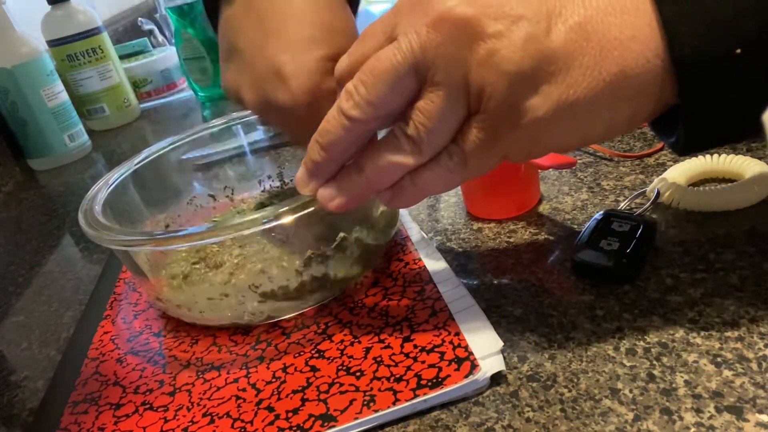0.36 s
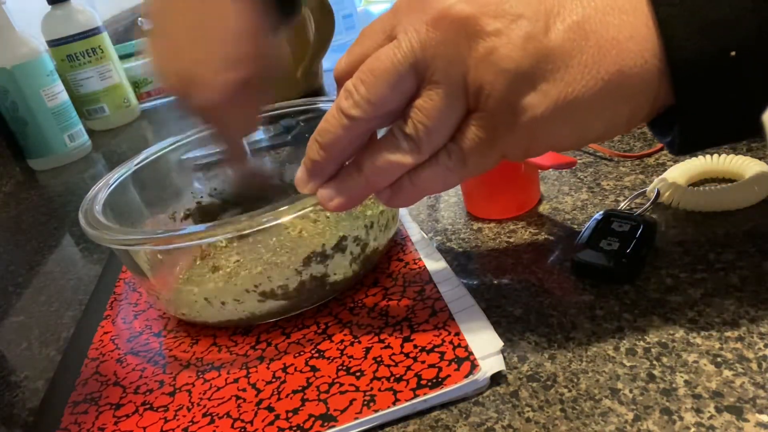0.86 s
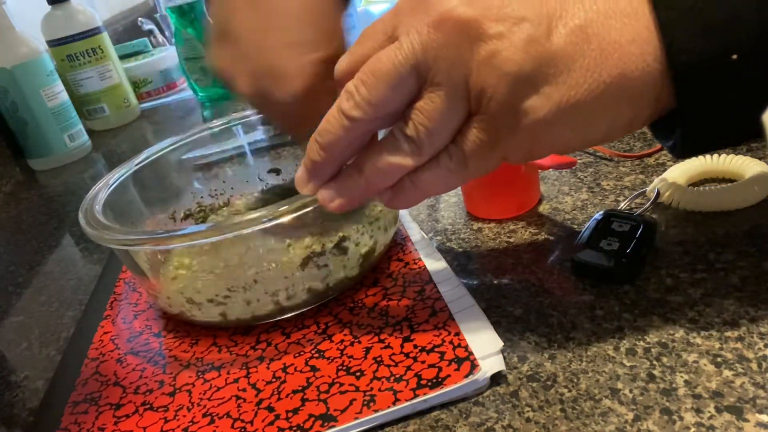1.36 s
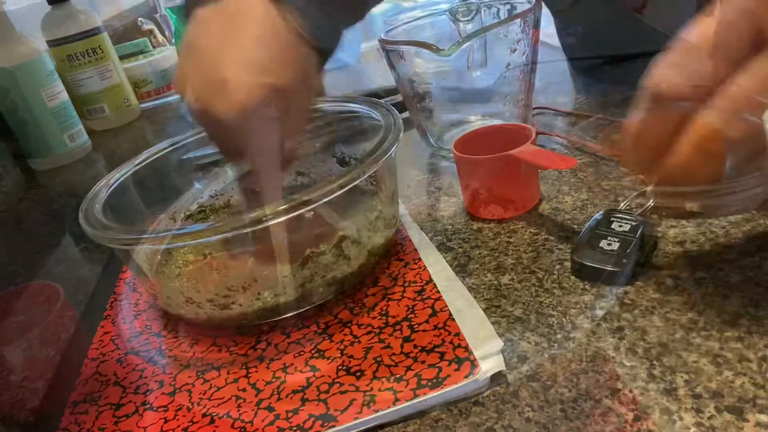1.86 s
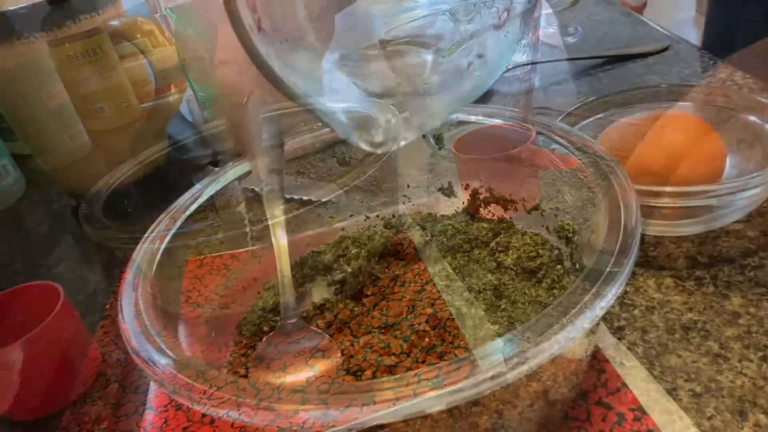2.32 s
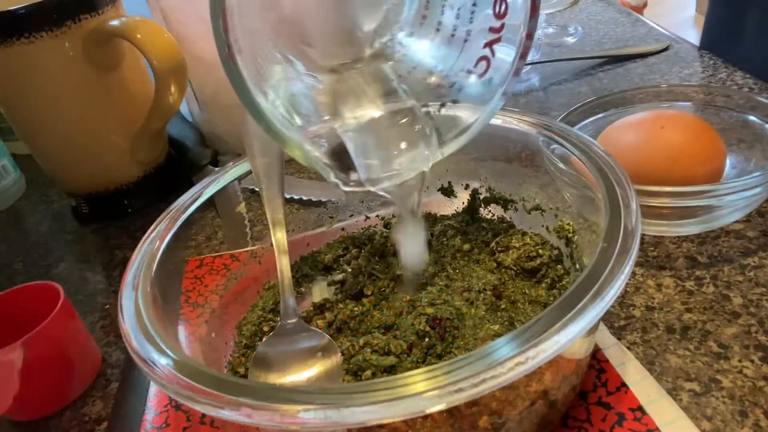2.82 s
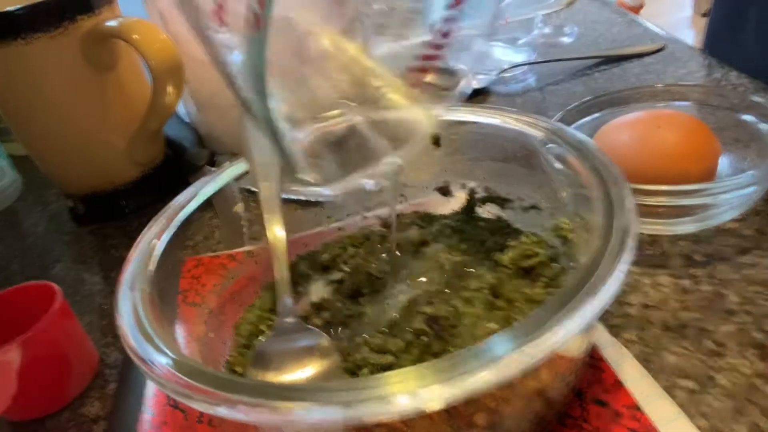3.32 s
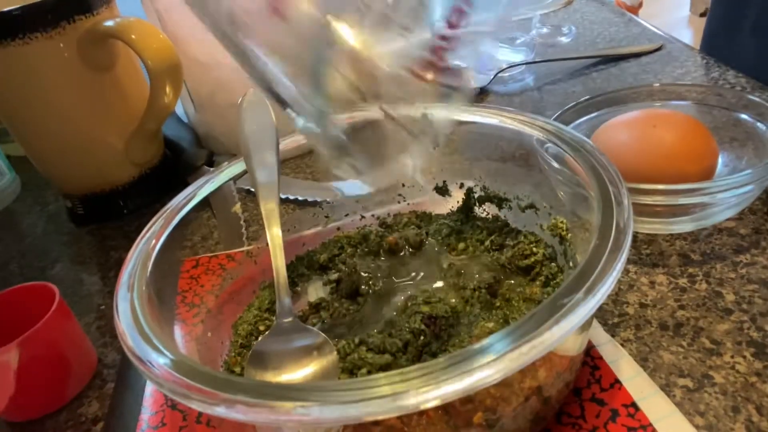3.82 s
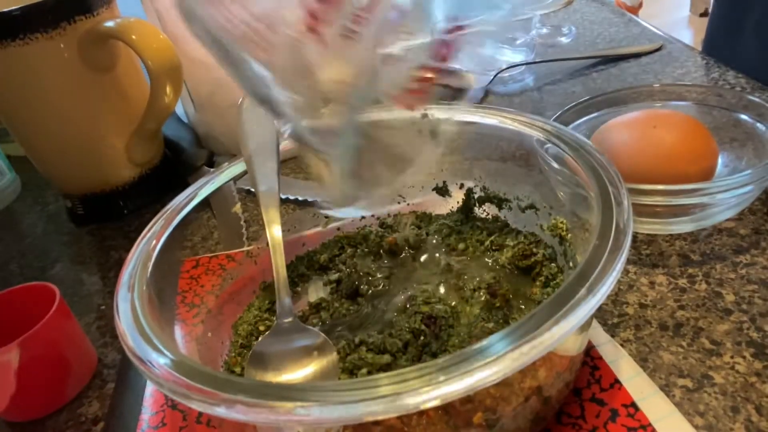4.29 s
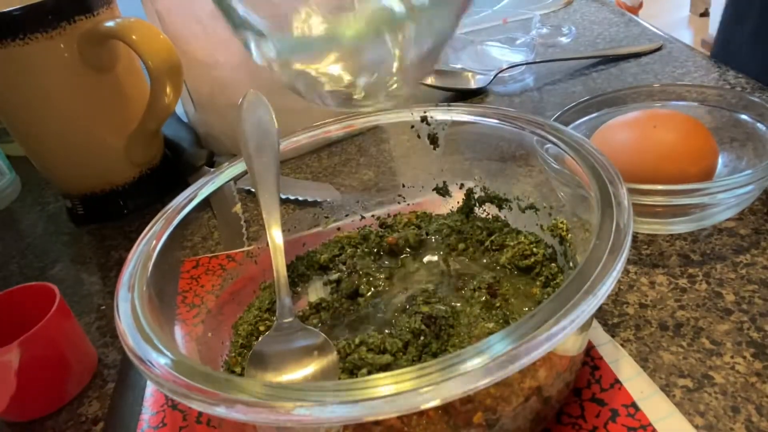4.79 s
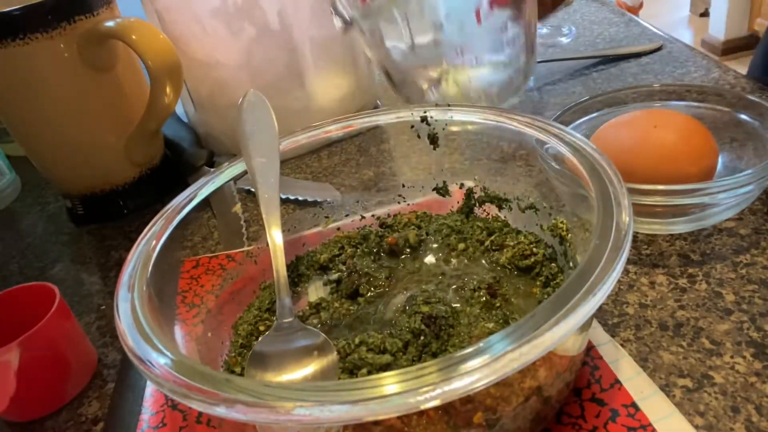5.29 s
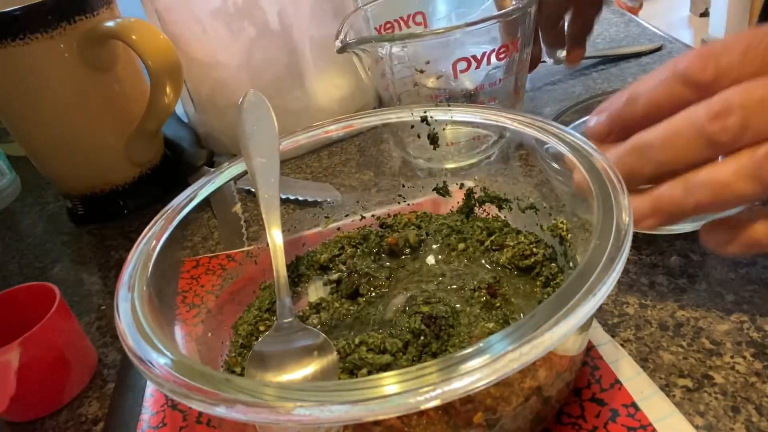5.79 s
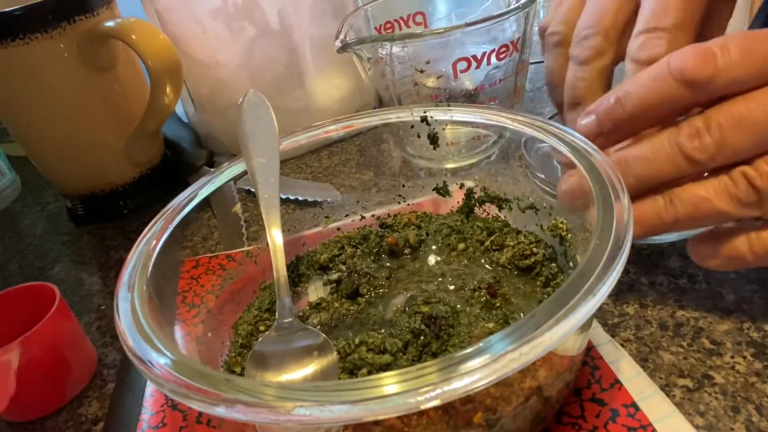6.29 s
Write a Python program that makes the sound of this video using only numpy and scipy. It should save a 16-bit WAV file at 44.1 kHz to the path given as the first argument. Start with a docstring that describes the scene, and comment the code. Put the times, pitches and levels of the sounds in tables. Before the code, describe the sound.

A close stereo microphone at a kitchen counter. From 0 to 1.9 s a spoon makes quiet, uneven gritty strokes in a glass bowl, with short bright clinks around 0.1 and 0.6 s, weaker ones at 0.8 and 1.5, and small knocks. At 1.9 to 2.05 s a small hard thing rattles quickly on the counter. Three brief scrapes follow from 2.35 to 2.65 s, while a low wavering hum rises. At 3.05 to 3.35 s come several dull thumps and sharper knocks. Thin hiss swells around 2.9, 3.8 to 4.2, 4.6 and 5.7 s, with faint narrow whistles; a tiny dropout occurs near 3.7. A dull thud lands at 4.6. From 5.43 to 5.72 s, further off and by far loudest, a glass jug bangs down and chatters, thin glassware ringing, with short room echo. A hand slides softly at 6.1 s with a dying squeak.

```python
"""A kitchen counter, heard from close by: a spoon stirs a gritty mix (noisy grains) and clinks on a glass bowl
(short rings). A small hard thing rattles, three short scrapes follow, other things knock and push on the counter
(noise puffs and ringing modes). Near the end a glass jug is set down hard and chatters, thin glassware rings, and
a hand slides on the counter. Under it are rumble, a low wavering hum and a dull room tone (coloured noise);
a thin hiss swells now and then, with narrow whistles (gliding bands of noise)."""
import sys
import numpy as np
from scipy import signal
from scipy.fft import rfft, irfft
from scipy.io import wavfile
from scipy.ndimage import uniform_filter1d

SR = 44100
rng = np.random.default_rng(int(sys.argv[2]) if len(sys.argv) > 2 else 0)


def invert_db(x):
    """Field ratio 10**(x/20) for x, a level in decibels (scalar or array-like)."""
    u = np.asarray(x, float) / 20
    return 10 ** u


def transcribe(signal):
    """Save signal, clipped to [-1, 1], as a 16-bit WAV file at the path in sys.argv[1]."""
    frames = np.atleast_2d(signal).T
    limited = np.clip(frames, -1, 1)
    pcm = np.round(limited * 32767).astype(np.int16)
    wavfile.write(sys.argv[1], SR, pcm)


N = 282240  # length [samples]
FARTHER_S = 5.4  # from this time [s] the hits come from further off

# Ringing tones of the glass bowl: (frequency [Hz], level [dB], time to fall 60 dB [s])
BOWL_MODES = [(996, -9, 0.14), (2440, -20, 0.11), (4427, 0.5, 0.066), (6720, -11, 0.041),
              (9480, -2.5, 0.052)]
# Colour of the dull crack of a hard contact: (frequency [Hz], level [dB per Hz])
CRACK_SPECTRUM = [(800, -35.5), (1250, -3.5), (2040, 0.5), (2600, -4.5), (3200, -16), (8000, -60.5)]
# Colour of the bright sizzle of a hard contact: (frequency [Hz], level [dB per Hz])
SIZZLE_SPECTRUM = [(2300, -35.5), (3100, -6.5), (3700, -6.5), (4500, -3.5), (5120, -11), (8330, -6),
                   (10500, -9), (13300, -17), (15500, -41)]


def rms_one(x):
    """Scale a signal to an rms of 1."""
    return x / np.sqrt(np.mean(x ** 2) + 1e-20)


def in_time(rows):
    """Turn a (time, value) table into a curve with one value per sample."""
    return np.interp(np.arange(N) / SR, *np.transpose(rows))


def ramp(span_s, before, after):
    """Hold one value, change in a straight line over the span, then hold the other."""
    return np.interp(np.arange(N) / SR, span_s, [before, after])


def at_hz(points, hz):
    """Read a spectrum table along a logarithmic frequency axis."""
    table_hz, value = np.transpose(points)
    return np.interp(np.log(hz), np.log(table_hz), value)


def drift(rate_hz, count=N):
    """Slow random wandering of rms 1: noise twice through a one-pole low-pass."""
    r = np.exp(-2 * np.pi * rate_hz / SR)
    return rms_one(signal.lfilter([1], [1, -2 * r, r * r], rng.standard_normal(count)))


def colour(x, spectrum):
    """Filter with the given spectrum at minimum phase; white noise keeps its energy."""
    hz = np.maximum(np.arange(8193) * SR / 16384, 1)
    cepstrum = irfft(np.log(invert_db(np.maximum(at_hz(spectrum, hz), -80))))
    # folding the cepstrum forward packs the filter's energy at its start
    cepstrum[1:8192] *= 2
    cepstrum[8193:] = 0
    pulse = irfft(np.exp(rfft(cepstrum)))
    pulse = pulse / np.sqrt(np.sum(pulse ** 2))
    return signal.fftconvolve(x, pulse[None], axes=1)[:, :N]


def stereo_noise(spectrum, source):
    """Mix two noises as middle and side, so each pitch is as alike left and right as set, then colour them."""
    # How alike left and right are: (frequency [Hz], likeness [0 to 1])
    likeness = [(60, 0.85), (150, 1), (380, 0.014), (950, 0.015), (2380, 0.017), (5980, 0.031),
                (15000, 0.38)]
    hz = np.maximum(np.arange(N // 2 + 1) * SR / N, 1)
    alike = np.clip(at_hz(likeness, hz), 0, 1)
    mid, side = rfft(source)
    mid = np.sqrt(0.5 + 0.5 * alike) * mid
    side = np.sqrt(0.5 - 0.5 * alike) * side
    return colour(irfft(mid + side * [[1], [-1]], N), spectrum)


def patches(x, depth_db, wide_hz, long_s):
    """Make a sound patchy: smoothed random gains over time and frequency."""
    hz, s, z = signal.stft(x, SR, nperseg=256)
    field = rng.standard_normal(z.shape[1:])
    for size, axis in ((wide_hz / hz[1], 0), (long_s / (s[1] - s[0]), 1)):
        cells = max(int(size), 1)
        for _ in range(2):
            field = uniform_filter1d(field, cells, axis=axis)
    patchy = signal.istft(z * invert_db(depth_db * rms_one(field)), SR, nperseg=256)[1]
    return rms_one(patchy[:, :N])


def gusts(rows, rise_s, fall_s):
    """Level curve: each row rises, drifts evenly in dB over its length, then falls away."""
    t = np.arange(N) / SR
    power = np.zeros(N)
    for start_s, length_s, level_db, change_db in rows:
        rise = np.clip((t - start_s) / rise_s, 0, 1)
        fall = np.exp(-np.maximum(t - start_s - length_s, 0) / fall_s)
        level = invert_db(level_db + change_db * np.clip((t - start_s) / length_s, 0, 1))
        power += (rise * fall * level) ** 2
    return np.sqrt(power)


def clicks_at(times, levels_db):
    """Single-sample clicks; a tiny offset keeps the filters after them from reaching needlessly small numbers."""
    clicks = np.zeros(N)
    clicks[np.round(times * SR).astype(int)] = invert_db(levels_db)
    return clicks + 1e-18


def dying(times, levels_db, fall_s):
    """A jump to the given level at each time, then an exponential fall."""
    return signal.lfilter([1], [1, -np.exp(-1 / (fall_s * SR))], clicks_at(times, levels_db))


def blows(times, levels_db, soft_s):
    """The force of each blow: it rises and falls in about the contact time."""
    r = np.exp(-1 / (soft_s * SR))
    return signal.lfilter([(1 - r) ** 2], [1, -2 * r, r * r], clicks_at(times, levels_db))


def chatter(envelope, per_s):
    """Dense, uneven tiny contacts at random times, under an envelope."""
    return envelope * (rng.random(N) < per_s / SR) * rng.standard_normal(N)


def ring(force, hz, t60):
    """One resonance: a unit click sets a dying sine of height 1 ringing."""
    r, w = invert_db(-60 / (t60 * SR)), 2 * np.pi * hz / SR
    return signal.lfilter([0, np.sin(w)], [1, -2 * r * np.cos(w), r * r], force + 1e-18)


def late_left(x):
    """The left side hears near things a little later than the right, and far things earlier."""
    near_lag_s, far_lag_s = 0.000302, -0.0002996
    n = np.arange(N)
    lag_s = np.where(n < FARTHER_S * SR, near_lag_s, far_lag_s)
    return np.array([np.interp(n - np.round(lag_s * SR), n, x[0]), x[1]])


def struck(modes, force, spread_db):
    """One force rings every mode with a wandering strength; neighbouring modes swing opposite ways."""
    out = np.zeros((2, N))
    steps = np.arange(N) // 512  # the strength is drawn anew every 512 samples
    for k, (hz, left_db, right_db, t60) in enumerate(modes):
        strength = invert_db(spread_db * rng.standard_normal(steps[-1] + 1))[steps]
        sides = invert_db(np.array([[left_db], [right_db]]))
        out += (-1) ** k * sides * ring(force * strength, hz, t60)
    return late_left(out)


def background():
    """Rumble through the counter, a wavering hum and the dull tone of the room: three coloured noises."""
    # Colours of the rumble, the hum and the room tone: (frequency [Hz], level [dB per Hz])
    rumble_spectrum = [(15, -63), (25, -29), (40, -13), (59, -1), (75, -2.5), (97, -17), (125, -12),
                       (160, -27.5), (280, -120)]
    hum_spectrum = [(59, -45), (100, -7.5), (134, -1), (155, 5), (194, -4.5), (226, -6.5), (264, -26),
                    (300, -14.5), (390, -38.5), (660, -120)]
    room_spectrum = [(130, -27.5), (220, -10), (265, -6.5), (751, -24.5), (1210, -28), (2080, -35.5),
                     (2500, -29), (2940, -50.5), (3500, -34), (4550, -73.5), (7700, -120)]
    # How much the counter is shaken, heard as rumble: (time [s], level [dB])
    shaking = [(0.0, -67.5), (0.71, -74), (1.03, -55.5), (1.76, -72), (1.99, -62), (3.1, -60),
               (3.37, -40.5), (3.55, -49.5), (3.69, -58), (4.33, -62.5), (4.67, -50), (5.2, -71.5),
               (5.6, -48.5), (5.92, -56.5), (6.4, -65)]
    # The room tone swells and sinks, middle band only: (time [s], level [dB])
    room_swell = [(0.0, -84.5), (1.7, -81.5), (2.1, -73), (2.9, -75), (3.5, -72), (4.3, -78.5),
                  (4.9, -70.5), (5.4, -74.5), (6.4, -70.5)]
    calm_db, hum_follows = -62, 0.15  # the hum takes up this share of the shaking's dB above calm

    rumble_db = in_time(shaking)
    hum_db = ramp((1, 2.46), -77.5, -54) + hum_follows * (rumble_db - calm_db)
    room_db = in_time(room_swell) + 7.5  # from the middle band to the whole tone
    layers = [
        (rumble_spectrum, rumble_db + 2.0 * drift(0.83)),
        (hum_spectrum, hum_db + 0.4 * drift(9.8)),
        (room_spectrum, room_db + 1.9 * drift(0.67)),
    ]
    return sum(invert_db(db) * stereo_noise(spectrum, rng.standard_normal((2, N))) for spectrum, db in layers)


def hiss():
    """A treble noise that swells now and then, lightly streaked by narrow slow bands."""
    # Colour of the hiss: (frequency [Hz], level [dB per Hz])
    hiss_spectrum = [(1470, -42.5), (2500, -5), (2700, -21), (3220, -13.5), (5160, -7), (6250, -11.5),
                     (6690, -6.5), (8550, -1.5), (9950, -4), (10600, -15), (11500, -5), (12700, -5.5),
                     (15500, -47.5)]
    # Swells: (start [s], length [s], level [dB], change over the swell [dB])
    swells = [(2.85, 0.34, -65.5, 2.5), (3.74, 0.49, -74.5, 8.5), (4.6, 0.32, -69, 3.5),
              (5.14, 0.038, -76, 3.5), (5.25, 0.048, -71.5, -10), (5.7, 0.4, -63, 4)]
    faint_db, faint_from_s = -83.5, 2.23  # a faint steady hiss sets in here

    faint = invert_db(faint_db) * (np.arange(N) / SR > faint_from_s)
    level = np.hypot(gusts(swells, rise_s=0.006, fall_s=0.03), faint)
    noise = stereo_noise(hiss_spectrum, rng.standard_normal((2, N)))
    streaked = patches(noise, depth_db=2.5, wide_hz=250, long_s=0.12)
    return level * invert_db(2.1 * drift(19.0)) * streaked


def whistles():
    """Narrow bands of noise around a tone that wavers and glides a little in pitch as it fades."""
    # Whistles: (start [s], length [s], first pitch [Hz], last pitch [Hz], starting level [dB], band width [Hz])
    whistle_rows = [(2.546, 0.466, 2460, 2450, -79, 140), (3.419, 0.56, 2490, 2460, -75, 140),
                    (4.622, 0.57, 2486, 2460, -80, 142), (3.725, 0.14, 8170, 8020, -65, 90),
                    (3.86, 0.11, 8100, 8330, -66, 70), (3.9, 0.36, 4950, 5150, -79, 150),
                    (3.87, 0.43, 6780, 6850, -73, 90), (4.852, .22, 1350, 1280, -79, 120),
                    (5.239, .06, 3640, 3570, -82, 60), (3.46, .48, 1220, 1180, -77, 160),
                    (5.834, .23, 5670, 5610, -62, 30)]
    squeak = (6.07, 0.22, 5082.5, 4988, -52.5, 185)  # same columns; starts strong and dies
    fade_db, squeak_fade_db = -3.5, -36  # level change over the length
    waver, edge = 0.004, 0.13  # share of the pitch; share of the length spent on each soft edge

    rows = [(*row, fade_db) for row in whistle_rows] + [(*squeak, squeak_fade_db)]
    out = np.zeros(N)
    for start_s, length_s, first_hz, last_hz, level_db, width_hz, change_db in rows:
        t = np.arange(0, length_s, 1 / SR)
        count = len(t)
        pitch_hz = np.linspace(first_hz, last_hz, count) * (1 + waver * drift(4.0, count))
        phase = 2 * np.pi * np.cumsum(pitch_hz) / SR
        band = drift(width_hz, count) * np.cos(phase) + drift(width_hz, count) * np.sin(phase)
        edges = np.clip(np.minimum(t, length_s - t) / (edge * length_s), 0, 1)
        level = invert_db(level_db + change_db * t / length_s + 0.83 * drift(45.0, count))
        out[round(start_s * SR):][:count] += level * edges * band
    return out


def stirring_and_scrapes():
    """Gritty strokes: uneven grains and patchy noise, the bowl's tones ringing along, and a dull rub."""
    # Colours of the grit and of the dull rub: (frequency [Hz], level [dB per Hz])
    grit_spectrum = [(880, -20.5), (1500, -7), (2280, -2), (2640, -1), (4800, -7.5), (8460, -4),
                     (10500, 0.5), (12700, -4.5), (14300, -13), (15500, -20.5)]
    rub_spectrum = [(80, -27), (130, 8), (340, -1.5), (450, -23.5), (900, -8.5), (1300, -18.5),
                    (2500, -43.5)]
    # Spoon strokes, then three short scrapes, last a hand slid on the counter:
    # (start [s], length [s], grit [dB], rub [dB])
    strokes = [(0.078, 0.36, -72.5, -74.5), (0.22, 0.2, -63, -68.5), (0.701, 0.36, -65.5, -70.5),
               (1.069, 0.38, -69.5, -63), (1.448, 0.46, -71.5, -76), (2.35, 0.07, -66.5, -61),
               (2.445, 0.029, -58, -52), (2.578, 0.074, -67.5, -62), (6.123, 0.15, -69.5, -56.5)]
    sag_db, rise_s, fall_s = -4, 0.018, 0.02  # change over each stroke, then its edges

    grit_level = gusts([(s, length, grit_db, sag_db) for s, length, grit_db, _ in strokes], rise_s, fall_s)
    rub_level = gusts([(s, length, rub_db, sag_db) for s, length, _, rub_db in strokes], rise_s, fall_s)
    # the mix crackles faintly between strokes, less and less, then stops
    settling = invert_db(-78.81) * ramp((1, 2.9), 1, 0)
    grit_level = np.hypot(grit_level, settling)

    # slow drift makes clumps, the random part makes lone ticks
    clumps_db, ticks_db = 3.5 * drift(25), 2 * np.minimum(rng.exponential(1, N), 2)
    grains = chatter(invert_db(clumps_db + ticks_db), per_s=700)
    source = rms_one(rng.standard_normal((2, N)) + 0.6 * rms_one(grains) * [[1], [0.6]])
    grit = patches(stereo_noise(grit_spectrum, source), depth_db=3, wide_hz=700, long_s=0.06)
    # the grains also ring the bowl
    rung = sum(invert_db(db) * rms_one(ring(grains, hz, t60)) for hz, db, t60 in BOWL_MODES)
    rub = invert_db(2.9 * drift(3.2)) * stereo_noise(rub_spectrum, rng.standard_normal((2, N)))
    return grit_level * invert_db(2.1 * drift(31.0)) * (grit + invert_db(-21.5) * rung) + rub_level * rub


def spoon_clinks():
    """Spoon on the bowl: short bright rings, damped by the hand and the mix."""
    # Spoon taps: (time [s], level [dB])
    taps = [(0.0933, -51.5), (0.0997, -80), (0.1089, -47.5), (0.5771, -49.5), (0.81, -64), (1.493, -61.5)]
    left_db, right_db = -5, 3.5  # added to each mode's level
    modes = [(hz, db + left_db, db + right_db, t60) for hz, db, t60 in BOWL_MODES]
    return struck(modes, blows(*np.transpose(taps), soft_s=0.00002), spread_db=2.5)


def glassware():
    """Thin glassware nearby is jolted once, sharply, and gives a few long thin rings."""
    # Ringing tones: (frequency [Hz], left level [dB], right level [dB], time to fall 60 dB [s])
    modes = [(6024, 0, 0, 0.2), (7644, -7, -7, 0.15), (8543, 0, 0, 0.17), (9421, -9, -9, 0.2)]
    jolt_s, jolt_db = 5.452, -44
    return struck(modes, blows(np.array([jolt_s]), jolt_db, soft_s=0.00002), spread_db=1)


def thumps():
    """Heavy, slow pushes shake the lowest ringing modes of the counter."""
    # Pushes: (time [s], thump level [dB], deep boom level [dB])
    pushes = [(0.108, -65, -48.5), (0.578, -53.5, -31), (0.787, -62, -24), (0.906, -63, -39.5),
              (0.99, -62, -55), (1.132, -52.5, -72), (1.893, -50, -37), (2.341, -69, -31),
              (3.051, -36.5, -34.5), (3.141, -46, -23), (3.19, -27.5, -9), (3.306, -32, -45),
              (3.332, -26.5, -22), (4.583, -23.5, -56), (5.45, -17.5, -7), (5.507, -36, -20),
              (5.631, -22.5, -34)]
    # Counter modes for thump and boom: (frequency [Hz], left [dB], right [dB], time to fall 60 dB [s])
    thump_modes = [(100.1, -7.5, -8.5, 0.42), (126.6, 3.5, -2, 0.15), (167, -16.5, -1.5, 0.093),
                   (213, 1.5, 10, 0.016)]
    boom_modes = [(67, -1.7, -2, 0.071), (76.7, 0.96, -2.5, 0.3)]
    s, thump_db, boom_db = np.transpose(pushes)
    thump = struck(thump_modes, blows(s, thump_db, soft_s=0.00066), spread_db=6.5)
    boom = struck(boom_modes, blows(s, boom_db, soft_s=0.0035), spread_db=4.0)
    return thump + boom


def knocks():
    """Noise puffs that die in a few ms give crack, ring and sizzle; soft blows ring the counter's knock and thud."""
    # Knocks and ticks: (time [s], tick [dB], sizzle over the tick [dB], knock [dB], thud [dB])
    hits = [(0.104, -73.5, 25, -82, -85), (0.274, -78, 19, -84, -80), (0.308, -79.5, 24, -73, -80),
            (0.43, -69, -5, -72, -73), (0.7391, -58.5, 7.5, -57.5, -75), (0.781, -83, -8, -56, -72),
            (0.8947, -72, 13, -61, -69), (1.1694, -58.5, -6, -58, -58), (1.242, -63, -16, -87, -94),
            (1.373, -70.5, 12.5, -68, -72), (1.7437, -47, -3.5, -48, -51), (2.261, -63, 8, -49.5, -48),
            (2.335, -50.5, 10.5, -45.5, -47), (2.548, -64, 2.5, -59, -46), (2.557, -69, 1, -54.5, -39.5),
            (2.6957, -71, 9.5, -70, -58), (2.851, -72, 18.5, -90, -84), (3.0622, -53, 1, -54, -45.5),
            (3.136, -60.5, 5, -50, -33.5), (3.1844, -54.5, -5, -50, -32.5), (3.196, -60.5, 4, -54, -31),
            (3.3027, -46.5, 7.5, -35, -28), (3.3214, -38, 4.5, -40, -28), (3.333, -52, 5.5, -42.5, -26.5),
            (3.752, -75.5, -3, -56.5, -45), (4.573, -52, -10, -44.5, -19), (4.584, -84, -10, -64, -25),
            (4.806, -65, 9.5, -78, -77), (4.8353, -62.5, 9.5, -60, -49), (4.9538, -68, 10.5, -56, -67),
            (5.434, -54.5, -19.5, -36.5, -34.5), (5.444, -37, -16, -38, -9.5),
            (5.449, -30.5, -0.5, -10.5, -1), (5.4576, -28, -7.5, -16, -0.5), (5.5055, -56, -16, -23.5, -6),
            (5.5804, -12, -2.5, -24.5, -18.5), (5.6314, -32.5, 0.5, -8, -2.5),
            (5.6397, -33, -11, -13, -3.5)]
    # A small hard thing rattles on the counter: (time [s], tick [dB], sizzle over the tick [dB], thud [dB])
    rattle_hits = [(1.8876, -41.5, 5, -28.5), (1.8938, -37, 8, -33), (1.915, -32, -13, -42),
                   (1.9227, -32.5, -9, -39), (1.933, -47, 7, -43), (1.9399, -40.5, 3.5, -33.5),
                   (1.9423, -44, 2.5, -39), (1.956, -48, -7, -37), (1.9745, -47, 5, -32.5),
                   (1.9835, -41, 4.5, -36), (1.997, -43.5, 0.5, -40), (2.004, -48, 3.5, -37),
                   (2.0109, -54, 3.5, -36.5), (2.019, -56, 2.5, -35), (2.0253, -64, 7, -40.5),
                   (2.045, -79, 0, -38.5)]
    # Modes of that small thing, then of the counter's knock and thud:
    # (frequency [Hz], left level [dB], right level [dB], time to fall 60 dB [s])
    rattle_modes = [(2050, -2, -2, 0.012), (2850, 0, 0, 0.011), (3400, -8, -8, 0.008),
                    (4600, -5, -5, 0.008)]
    knock_modes = [(636, -2, 1.5, 0.023), (782, -14, -8.5, 0.12), (1004, 2.5, 1, 0.017),
                   (1085, -3, -11.5, 0.044), (1170, -8, 8, 0.0053)]
    thud_modes = [(227, -0.5, -14, 0.022), (310, -7, -7.5, 0.026), (416.5, -8, 2.5, 0.056),
                  (508, -3.5, -9.5, 0.063)]
    ring_over_tick_db, knock_over_thud_db = -11, -7  # for the rattling thing

    rattled = [(s, tick, sizzle, thud + knock_over_thud_db, thud) for s, tick, sizzle, thud in rattle_hits]
    s, tick_db, sizzle_db, knock_db, thud_db = np.transpose([*hits, *rattled])
    plain = len(hits)  # the rows after these are the rattling thing
    shared, own = rng.standard_normal((2, 2, N))  # noise common to both sides, and each side's own

    crack_level = dying(s[:plain], tick_db[:plain], fall_s=0.0065)
    crack = colour((shared[0] + own) * crack_level, CRACK_SPECTRUM)
    ring_level = dying(s[plain:], tick_db[plain:] + ring_over_tick_db, fall_s=0.0014)
    ringing = struck(rattle_modes, shared[0] * ring_level, spread_db=2.0)
    sizzle_level = dying(s, tick_db + sizzle_db, fall_s=0.0022)
    sizzle = colour((shared[1] + 1.1 * own) * sizzle_level, SIZZLE_SPECTRUM)
    knock = struck(knock_modes, blows(s, knock_db, soft_s=0.00008), spread_db=3.0)
    thud = struck(thud_modes, blows(s, thud_db, soft_s=0.0004), spread_db=1.5)
    return late_left(crack + sizzle) + ringing + knock, thud


def jug():
    """The glass jug chatters on the counter after every bounce: its modes ring and each contact ticks."""
    # Bounces: (time [s], contact level [dB])
    bounces = [(5.571, -45), (5.578, -29), (5.595, -57.5), (5.6193, -37.5), (5.6408, -35.5),
               (5.6636, -47.5), (5.68, -50), (5.6988, -53), (5.716, -62.5)]
    # Ringing tones of the glass: (frequency [Hz], left [dB], right [dB], time to fall 60 dB [s])
    glass_modes = [(960, -7, -7.5, 0.063), (1255, 5.5, -0.5, 0.025), (1680, 2, 1.5, 0.03),
                   (1920, -6, -6.5, 0.03), (2110, -11, -3.5, 0.046), (2266, 1, -7.5, 0.053),
                   (2790, -6.5, -7.5, 0.045), (3730, -11, -10.5, 0.025), (4100, -1.5, -3, 0.034),
                   (4830, -19.5, -11.5, 0.019), (5930, -22.5, -14.5, 0.034), (7850, -13, -14.5, 0.025)]
    force = chatter(dying(*np.transpose(bounces), fall_s=0.01), per_s=3900)
    both_sides = force * np.ones((2, 1))
    ticks = invert_db(16) * colour(both_sides, CRACK_SPECTRUM) + invert_db(14) * colour(both_sides, SIZZLE_SPECTRUM)
    return struck(glass_modes, force, spread_db=2.5) + late_left(ticks)


def kitchen(x):
    """The room's dense echoes: noise that dies at its own pace in each band, different on each side."""
    # How long the echoes last: (frequency [Hz], time to fall 60 dB [s])
    echo_t60 = [(100, 0.32), (500, 0.49), (2000, 0.46), (4300, 0.4), (12000, 0.25)]
    first_echo_s = 0.0034
    hz, s, z = signal.stft(rng.standard_normal((2, SR // 2)), SR, nperseg=256)
    t60 = np.maximum(at_hz(echo_t60, np.maximum(hz, 1)), 0.05)[:, None]
    echoes = signal.istft(z * invert_db(-60 * s / t60), SR, nperseg=256)[1]
    # fade in around the first echo: silent to half its time, full at one and a half
    echoes *= np.clip(np.arange(echoes.shape[1]) / (first_echo_s * SR) - 0.5, 0, 1)
    echoes = echoes / np.sqrt(np.sum(echoes ** 2) / 2)
    return signal.fftconvolve(x, echoes, axes=1)[:, :N]


def scene():
    """Hits with their room over the steady layers; late hits land further off and wake the room more."""
    (knock, thud), glass_jug = knocks(), jug()
    far_db = np.where(np.arange(N) < FARTHER_S * SR, 0, 8)
    to_room = invert_db(far_db) * (knock + invert_db(-2.5) * thud + invert_db(-2) * glass_jug)
    room = invert_db(-16) * kitchen(to_room)
    unechoed = background() + hiss() + whistles() + stirring_and_scrapes()
    return unechoed + spoon_clinks() + glassware() + thumps() + knock + thud + glass_jug + room


def band_limit(x):
    """A steep low-pass at the top of the band."""
    return signal.sosfilt(signal.butter(12, 15780, fs=SR, output="sos"), x)


def record(dry):
    """The microphone cuts the deep bass, has a notch in the treble, rounds the peaks and drops out once."""
    bass_cut_hz, notch_hz, notch_width_hz = 49, 10435, 2450  # notch width of a single pass
    silent_from_s, silent_to_s, edge_s = 3.681, 3.699, 0.0034

    x = signal.sosfilt(signal.butter(2, bass_cut_hz, "high", fs=SR, output="sos"), dry)
    notch = signal.iirnotch(notch_hz, notch_hz / notch_width_hz, fs=SR)
    for _ in range(2):
        x = signal.lfilter(*notch, x)
    x = 1.096 * np.tanh(x / 0.83)
    t = np.arange(N) / SR
    outside_s = np.maximum(silent_from_s - t, t - silent_to_s)  # distance from the silent moment
    mix = x * np.clip(outside_s / edge_s, 0, 1)
    return band_limit(mix)


dry = scene()
out = record(dry)
transcribe(out)
```